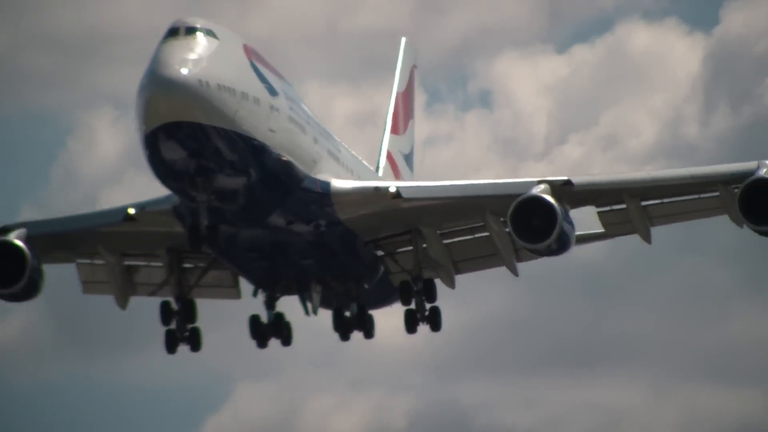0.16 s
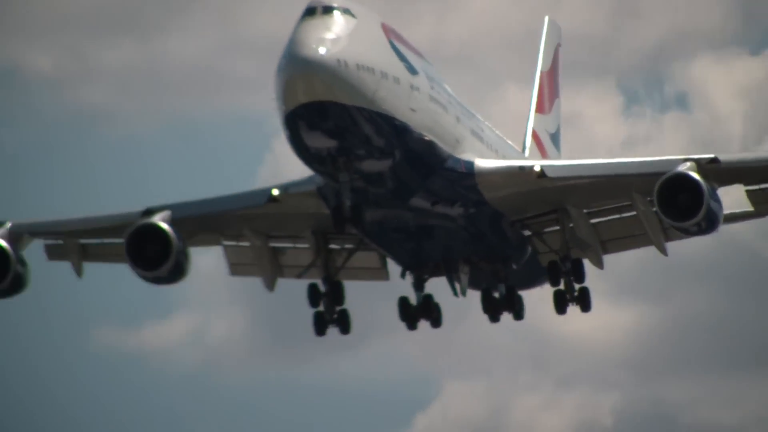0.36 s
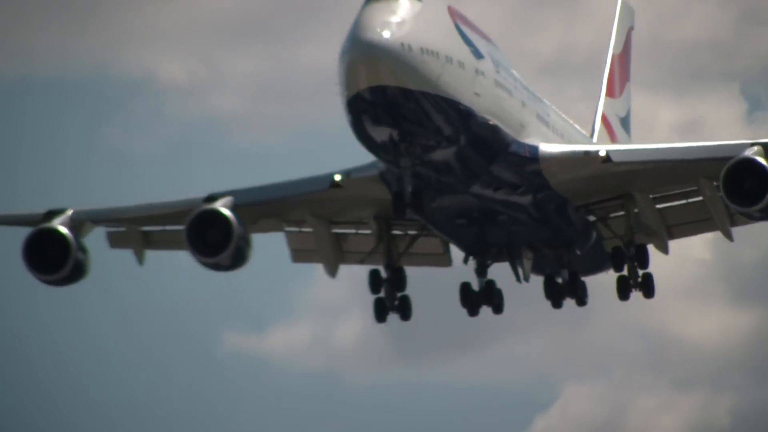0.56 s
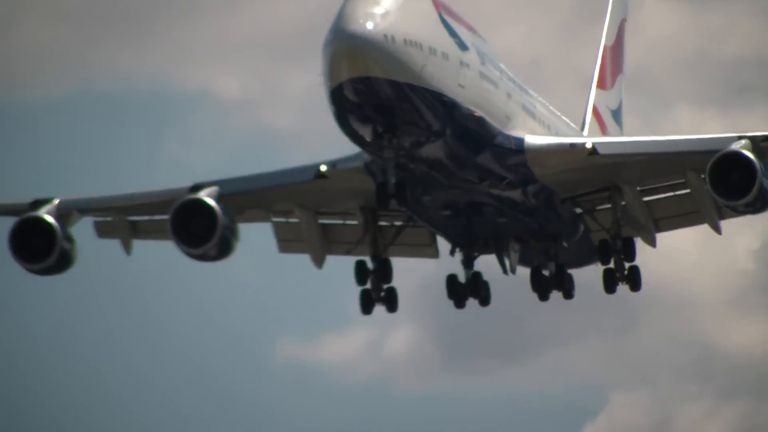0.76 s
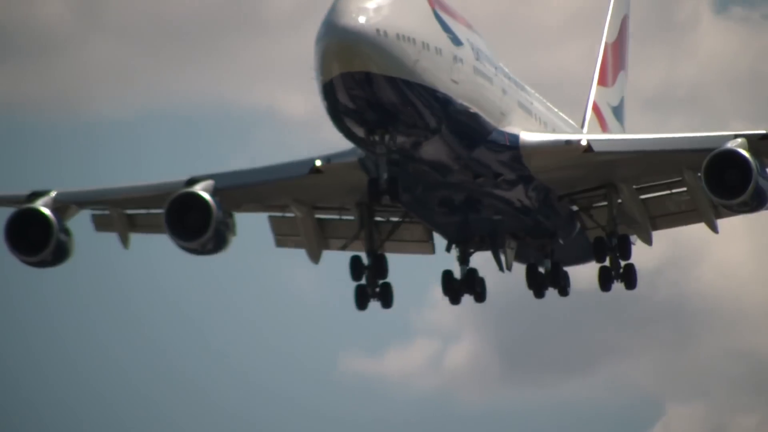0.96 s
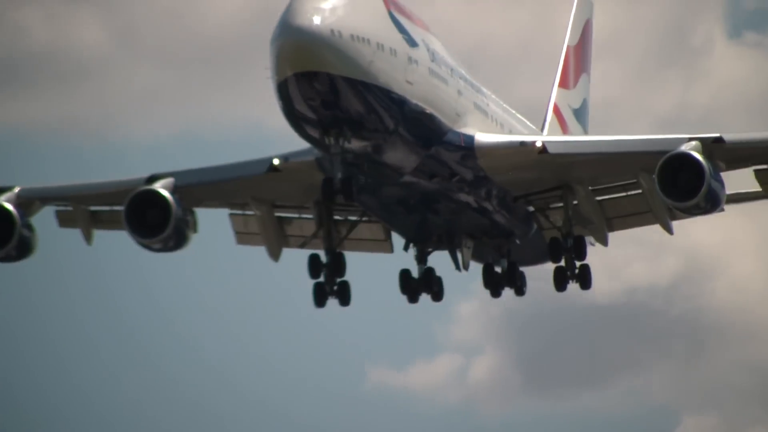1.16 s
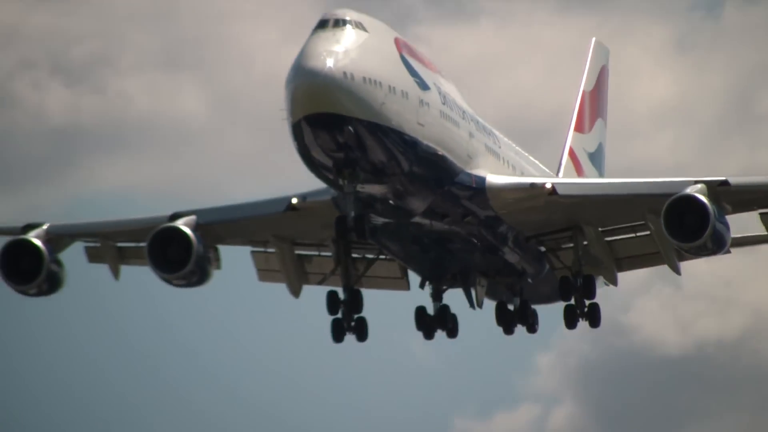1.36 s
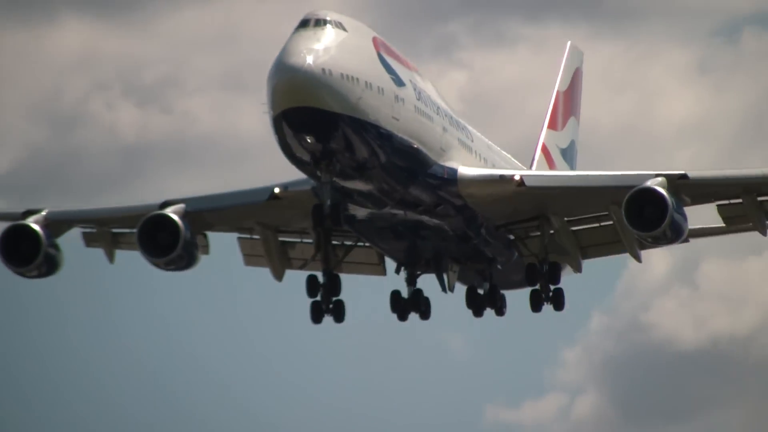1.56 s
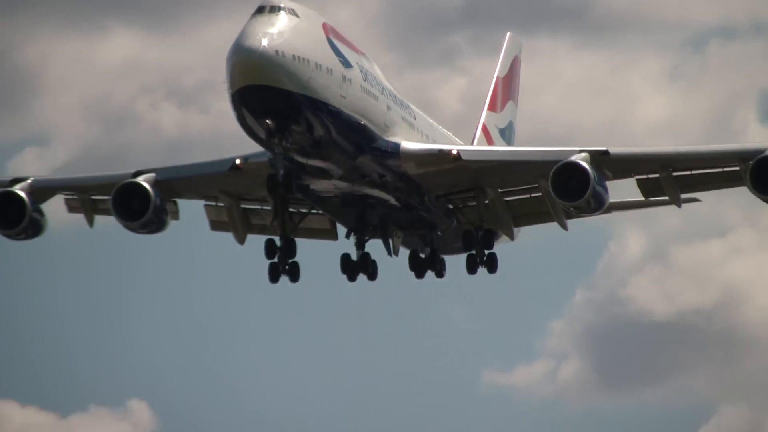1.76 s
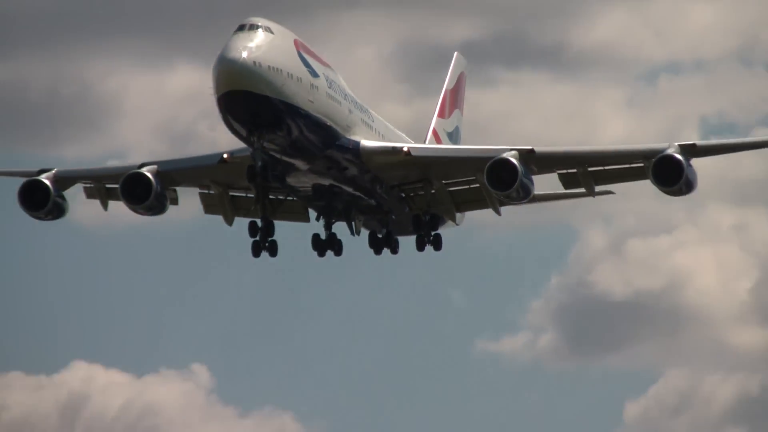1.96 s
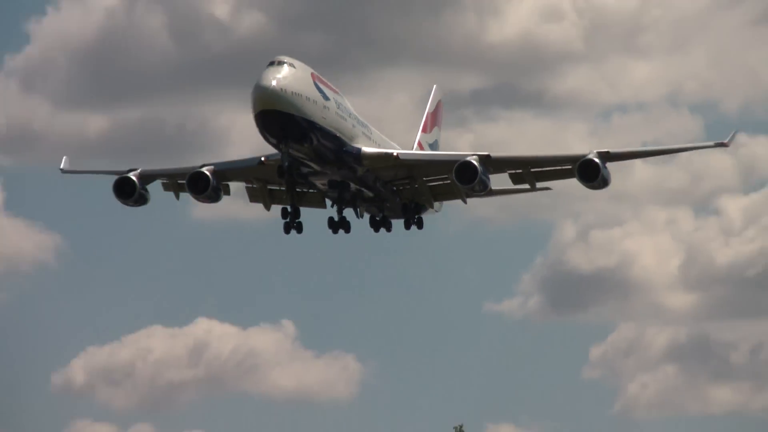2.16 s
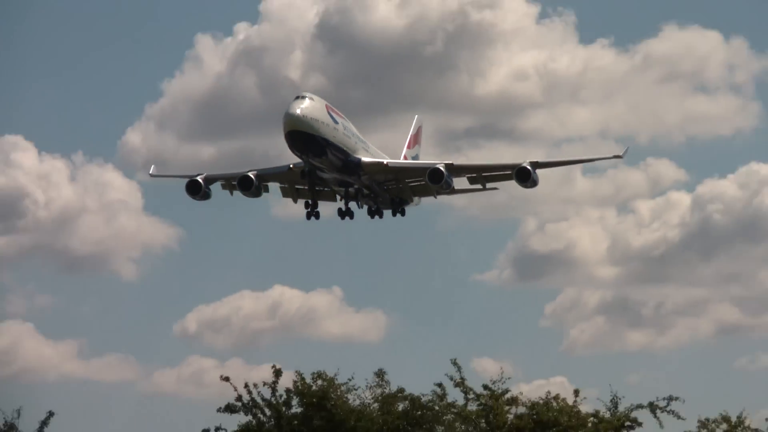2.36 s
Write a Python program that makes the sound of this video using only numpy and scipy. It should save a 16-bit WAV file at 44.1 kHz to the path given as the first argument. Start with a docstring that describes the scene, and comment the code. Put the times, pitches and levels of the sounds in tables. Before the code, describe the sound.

Airliner jet engines roar steadily overhead while strong wind buffets and overloads the microphone

```python
"""A four-engined airliner on approach, heard from the ground: a broad jet roar, with fan rush and treble hiss,
made of shaped noise. The faint, fuzzy fan whine is noise squeezed into narrow bands.
Wind buffets both microphone ports with low, lumpy noise; short gusts add faster flutter and a brighter rasp,
often stronger on one port, and drive the input into hard clipping. Overloads tick and fizz.
Amplifier hiss and a thin, steady circuit tone lie underneath."""
import sys
import numpy as np
from scipy import signal
from scipy.fft import rfft, irfft, next_fast_len
from scipy.io import wavfile
from scipy.ndimage import uniform_filter1d, map_coordinates

SR = 44100
rng = np.random.default_rng(int(sys.argv[2]) if len(sys.argv) > 2 else 0)


def invert_db(level):
    """Linear amplitude ratio for a level in decibels (20 dB per decade), elementwise."""
    return 10 ** (np.asarray(level, dtype=float) / 20)


def generate_wav(signal):
    """Clip the signal to [-1, 1] and save it as 16-bit WAV at the path in sys.argv[1]."""
    frames = np.transpose(np.atleast_2d(signal))
    scaled = np.clip(frames, -1, 1) * 32767
    pcm = np.round(scaled).astype(np.int16)
    wavfile.write(sys.argv[1], SR, pcm)


N = 111573  # length in samples

# Levels of the three jet noises as heard, with brief dips, before trims:
# t/s, roar level/dB, fan rush level/dB, hiss level/dB
JET_LEVELS = [(0.02, -27, -39.5, -45.5), (0.04, -28.5, -41.5, -49), (0.3, -22.5, -38, -42.5),
              (0.41, -25, -39, -45), (0.79, -24.5, -37.5, -45), (0.92, -29.5, -41.5, -49),
              (1.02, -25, -36.5, -46), (1.25, -28.5, -39, -49.5), (1.31, -31.5, -43.5, -52.5),
              (1.53, -27.5, -37.5, -50.5), (1.93, -29, -38.5, -53), (2.05, -27.5, -34.5, -52),
              (2.2, -32.5, -40.5, -56), (2.27, -29, -37.5, -55.5), (2.41, -30.5, -36, -56),
              (2.5, -27.5, -33.5, -50.5)]
# Tone colour of each jet noise: f/Hz, relative level/dB
ROAR_SPECTRUM = [(60, -10.5), (200, -2), (450, -4.5), (750, -3), (1050, -1.5), (1500, -8), (2100, -15.5),
                 (3000, -29), (4500, -64), (9000, -120)]
FAN_SPECTRUM = [(900, -63), (1500, 1), (2100, -2.5), (2800, -4.5), (3600, -9.5), (4800, -24.5), (7000, -63),
                (10000, -120)]
HISS_SPECTRUM = [(1500, -62), (2800, -14.5), (4000, -2), (5500, -4.5), (7000, -9.5), (8500, -18),
                 (11000, -31.5), (16000, -56)]
# How alike left and right are in each jet noise: f/Hz, likeness (1 = same)
ROAR_LIKENESS = [(200, 1), (900, 0.95), (2700, 0.79)]
FAN_LIKENESS = [(1800, 0.99), (3500, 0.78)]
HISS_LIKENESS = [(3000, 0.77), (5000, 0.28), (8000, 0.067)]
# Fuzzy fan tones: centre f/Hz, half-width/Hz, level/dB before wobble and panning
WHINE_TONES = [(2296, 63, -46.5), (2870, 66, -66)]
# Level of the wind buffeting as heard, before its trim: t/s, level/dB
WIND_LEVELS = [(0.02, -9), (0.1, -13), (0.15, -11.5), (0.19, -18), (0.27, -12.5), (0.38, -10),
               (0.44, -14.5), (0.61, -12.5), (0.73, -14.5), (0.77, -11), (0.92, -2.5), (0.94, -13),
               (1.33, -9.5), (1.42, -16), (1.45, -12.5), (1.48, -16.5), (1.57, -6.5), (1.63, -16),
               (1.69, -7), (1.76, -13), (1.87, -5), (1.95, -16), (1.97, -12), (2.14, -6.5), (2.2, -14),
               (2.31, -10.5), (2.35, -10), (2.38, -5.5), (2.43, -17), (2.51, -5)]
# Tone colour of the buffeting: f/Hz, relative level/dB
BUFFET_SPECTRUM = [(8, -19.5), (18, 1.5), (45, -2), (70, -8), (120, -14.5), (200, -22), (300, -28.5),
                   (450, -44.5), (800, -56.5), (1500, -120)]
# How alike the buffeting is on the two ports: f/Hz, likeness (1 = same)
BUFFET_LIKENESS = [(25, 0.8), (60, 0.55), (120, 0.35)]
# Gusts: centre t/s, length/s, level/dB before panning, left over right/dB, rasp over flutter/dB
GUST_EVENTS = [(0.472, 0.056, -22, 9, -15.5), (0.867, .09, -7.5, -5.5, -11.5),
               (1.072, 0.038, -21, -24, -16), (1.152, 0.043, -18, -11.5, -9.5),
               (1.208, 0.055, -8.5, 3.5, -10.5), (1.254, 0.015, -13, 13.5, -2.5),
               (1.299, 0.062, -13, 3, -12), (1.528, 0.055, -23.5, -18, -11.5), (1.792, 0.033, -28, 19, -20),
               (2.072, 0.064, -10.5, -4.5, -17), (2.52, 0.093, -20.5, 9, -15)]
# Tone colour of the gust flutter and its rasp: f/Hz, relative level/dB
FLUTTER_SPECTRUM = [(20, -40), (50, -12), (110, 2.5), (200, 4), (330, -6), (500, -18), (800, -44),
                    (3000, -120)]
RASP_SPECTRUM = [(150, -37), (300, -4), (500, 1.5), (700, -5), (950, -21.5), (1500, -53), (3000, -120)]


def unit(x):
    """Scale to an rms (average strength) of 1."""
    return x / np.sqrt(np.mean(x ** 2) + 1e-20)


def along(points, hz):
    """Read a value between (f/Hz, value) points on a log frequency axis."""
    f, v = np.transpose(points)
    return np.interp(np.log(hz + 1), np.log(f + 1), v)


def curves(rows):
    """Turn each column after the time into one value per sample."""
    s, *cols = np.transpose(rows)
    return [np.interp(np.arange(N) / SR, s, c) for c in cols]


def wobble(rate):
    """Draw a smooth random curve through `rate` random points a second."""
    return map_coordinates(rng.standard_normal(400), [np.arange(N) * rate / SR])


def wobble_pair(rate):
    """Draw separate wobbles for left and right."""
    return np.array([wobble(rate), wobble(rate)])


def sides(pan_db):
    """Left and right gains, as a column; pan_db is left over right."""
    return invert_db(np.array([pan_db / 2, -pan_db / 2]))[:, None]


def filtered(x, response):
    """Strengthen or weaken each frequency of x by response(f/Hz)."""
    m = next_fast_len(N + 8192)  # spare room keeps the end from wrapping onto the start
    return irfft(rfft(x, m) * response(np.fft.rfftfreq(m, 1 / SR)), m)[..., :N]


def rush(spectrum, alike, patchy_db):
    """Coloured stereo noise of rms 1, with soft random patches in time and frequency."""
    z = signal.stft(rng.standard_normal((2, N)), nperseg=512)[2]
    field = rng.standard_normal(z.shape[1:])
    field = uniform_filter1d(field, size=6, axis=0)
    field = uniform_filter1d(field, size=10, axis=1)
    pair = signal.istft(z * invert_db(patchy_db * unit(field)), nperseg=512)[1][:, :N]

    def response(hz):
        # the more alike the two sides, the more sound goes into the shared middle
        turn = np.arccos(np.clip(along(alike, hz), -1, 1)) / 2
        return invert_db(along(spectrum, hz)) * [np.cos(turn), np.sin(turn)]

    mid, side = filtered(pair, response)
    return unit(np.array([mid + side, mid - side]))


def jet_roar(level_db):
    """The broad roar: low and middle noise, nearly the same on both sides."""
    return invert_db(level_db + 2.5) * rush(ROAR_SPECTRUM, ROAR_LIKENESS, patchy_db=1.23)


def fan_rush(level_db):
    """The fan's rushing noise, mostly between 1 and 4 kHz."""
    return invert_db(level_db + 1.5) * rush(FAN_SPECTRUM, FAN_LIKENESS, patchy_db=1.17)


def treble_hiss(level_db):
    """The jet's hiss: wide, patchy high noise with a slight flicker."""
    flicker_db = 0.2 * wobble(21.13)
    return invert_db(level_db + 1.5 + flicker_db) * rush(HISS_SPECTRUM, HISS_LIKENESS, patchy_db=2.05)


def fan_whine(fan_db):
    """Fuzzy fan tones: narrow bands of noise whose level follows that of the fan rush."""
    whine = np.zeros(N)
    for hz, width, db in WHINE_TONES:
        gain = invert_db(db + 1.1 * wobble(8.6))
        band = filtered(rng.standard_normal(N), lambda f: 1 / (1 + ((f - hz) / width) ** 2))
        whine += gain * unit(band)
    return whine * invert_db(fan_db - fan_db.mean())


def jets():
    """All the engine sounds, shimmering together in turbulent air."""
    roar_db, fan_db, hiss_db = curves(JET_LEVELS)
    shimmer_db = 0.12 * wobble(9) + 0.31 * wobble(34.77)
    engines = jet_roar(roar_db) + fan_rush(fan_db) + treble_hiss(hiss_db) + fan_whine(fan_db)
    return engines * invert_db(shimmer_db) * sides(4)  # left is 4 dB stronger


def buffeting():
    """Wind pushing on both microphone ports: lumpy low noise, partly different on each."""
    level_db, = curves(WIND_LEVELS)
    lumps = invert_db(1.3 * wobble_pair(18))
    noise = unit(lumps * rush(BUFFET_SPECTRUM, BUFFET_LIKENESS, patchy_db=0.63))
    return invert_db(level_db + 2.5) * sides(3) * noise  # left is 3 dB stronger


def gusts():
    """Short gusts: bell-shaped bursts of fast flutter and brighter rasp, leaning left or right."""
    t = np.arange(N) / SR
    flutter_lumps = invert_db(3.2 * wobble_pair(70))
    flutter = unit(flutter_lumps * rush(FLUTTER_SPECTRUM, [(200, 0.2)], patchy_db=0.1))
    rasp_lumps = invert_db(5.0 * wobble_pair(90))
    rasp = unit(rasp_lumps * rush(RASP_SPECTRUM, [(500, 0.13)], patchy_db=1.9))
    total = np.zeros((2, N))
    for s, length, db, pan_db, rasp_db in GUST_EVENTS:
        swell = np.exp(-(2 * (t - s) / length) ** 2)
        total += invert_db(db) * sides(pan_db) * swell * (flutter + invert_db(rasp_db) * rasp)
    return total


def wind():
    """Buffeting and gusts; the widest swings round off softly, and the treble is then cut."""
    swing_top = 1.05  # limit of the rounding, before the treble cut
    rounded = swing_top * np.tanh(1.103 * (buffeting() + gusts()) / swing_top)
    return filtered(rounded, lambda hz: 1 / (1 + (hz / 1500) ** 4))


def circuit_tone():
    """A very faint, thin, steady high tone: one sine wave."""
    tone_hz, tone_db = 12207, -79
    return invert_db(tone_db) * np.sin(2 * np.pi * tone_hz * np.arange(N) / SR)


def amplifier_hiss():
    """The microphone amplifier's own white noise, stronger on the left."""
    hiss_db, pan_db = -61.5, 5.5
    return invert_db(hiss_db) * sides(pan_db) * rng.standard_normal((2, N))


def ticks(x):
    """The input stage kicks against the swing when a channel nears overload after a rest."""
    tick_at, rest = 0.84, round(0.007 * SR)  # trigger height; rest in samples
    tick_db, spread_db, tick_t60_s = -27, 7, 0.0005  # t60: time to die away by 60 dB
    fizz_db, fizz_t60_s = -12.5, 0.0053  # a scrap of noise after each tick, relative to it

    over = np.abs(x) > tick_at
    seen = np.cumsum(over, axis=1)
    seen_before_rest = np.pad(seen, ((0, 0), (rest, 0)))[:, :N]
    first = over & (seen - seen_before_rest == 1)
    kicks = -np.sign(x) * first * invert_db(tick_db + spread_db * rng.uniform(-1.14, 1, (2, N)))

    def dying(t60):
        return signal.lfilter([1], [1, -invert_db(-60 / (t60 * SR))], kicks)

    fizz = invert_db(fizz_db) * dying(fizz_t60_s) * rng.standard_normal((2, N))
    return dying(tick_t60_s) + fizz


def scene():
    """The airliner and the wind together."""
    gale = wind()
    return jets() + gale


def top_cut(x):
    """Nothing passes above the cut-off."""
    return signal.sosfilt(signal.butter(12, 15800, fs=SR, output="sos"), x)


def record(dry):
    """Add the circuit tone, amplifier hiss and overload ticks, then cut the peaks off flat."""
    x = dry + circuit_tone() + amplifier_hiss()
    clip_top = 0.995  # full scale is 1
    mix = np.clip(x + ticks(x), -clip_top, clip_top)
    return top_cut(mix)


dry = scene()
out = record(dry)
generate_wav(out)
```